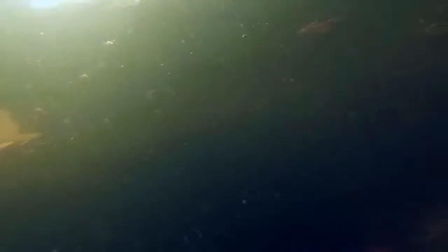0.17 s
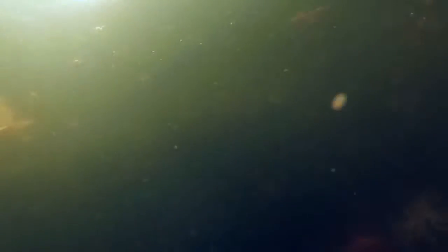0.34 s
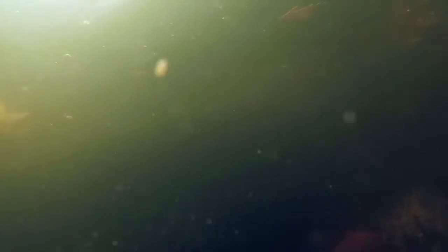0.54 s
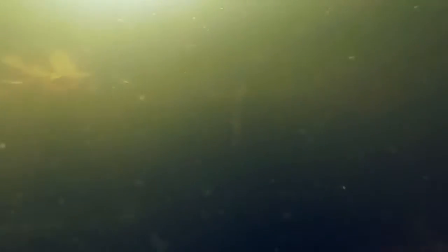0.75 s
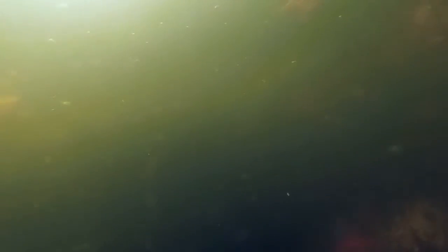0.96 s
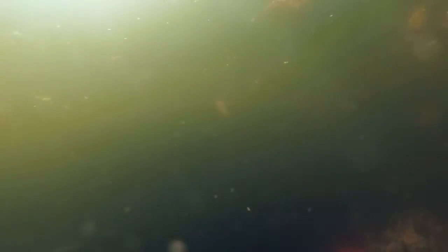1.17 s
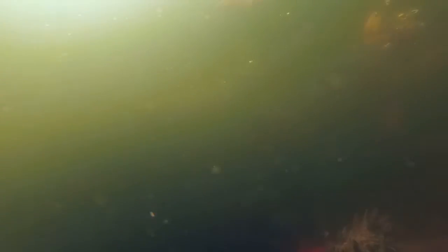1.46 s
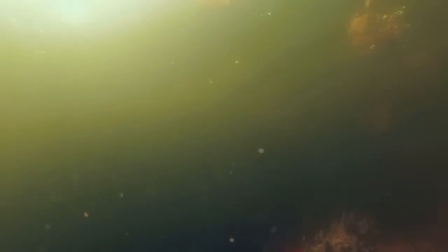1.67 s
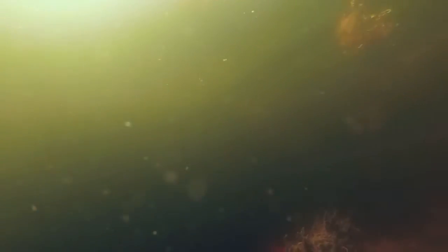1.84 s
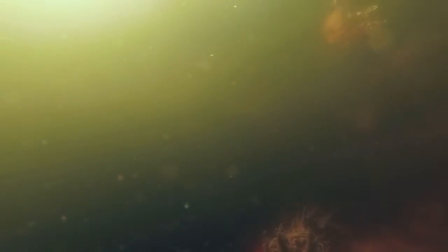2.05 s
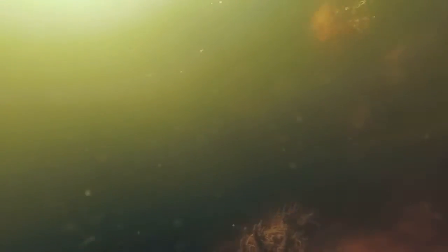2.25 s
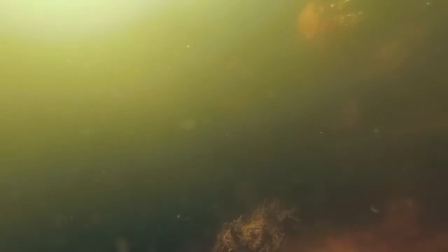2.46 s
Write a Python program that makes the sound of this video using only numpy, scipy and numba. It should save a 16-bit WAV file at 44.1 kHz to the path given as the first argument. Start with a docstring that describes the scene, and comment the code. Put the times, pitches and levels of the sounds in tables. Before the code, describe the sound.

Air gulps and bubbles burble under pond water, giving way to a steady muffled pump hum

```python
"""Pump hum under a garden pond

A small camera hangs in a sealed housing under the surface; its microphone sits inside, in the trapped air.
A mains pump, heard through the water, hums as sine tones and rattles as pulsed noise in resonant bands.
Flow rings the trapped air; bubbles and gulps escape as damped tones; the housing wobbles on its pole, knocks
and ticks. Filtered noise is the pond and the stirred water; the recorder's gain ducks when it gets loud."""
import sys
import numpy as np
from scipy import signal
from scipy.io import wavfile
from scipy.ndimage import uniform_filter1d
from numba import njit

SR = 44100
rng = np.random.default_rng(int(sys.argv[2]) if len(sys.argv) > 2 else 0)


def volts_from_decibels(level):
    """Turn decibel levels (scalar or array-like) into linear amplitude factors."""
    exponent = np.asarray(level, float) / 20
    return 10 ** exponent


def wav_out(sig):
    """Save sig, one row per channel (or a flat mono array), as 16-bit PCM at SR to the path in sys.argv[1]."""
    wavfile.write(sys.argv[1], SR, np.round(np.clip(np.atleast_2d(sig).T, -1, 1) * 32767).astype(np.int16))


N = 114660
T = np.arange(N) / SR
MAINS_HZ = 60.02


def level(x, db):
    """Set the rms level."""
    return x * volts_from_decibels(db) / np.sqrt(np.mean(x ** 2))


def curve(table, column):
    """One column of a table, interpolated over time to every sample."""
    return np.interp(T, [row[0] for row in table], [row[column] for row in table])


@njit
def svf(x, hz, width):
    """State-variable band-pass with a moving centre, gain 1 at the centre."""
    y, band_state, low_state = np.empty(len(x)), 0., 0.
    for i in range(len(x)):
        g = np.tan(np.pi * hz[i] / SR)
        damping = width / hz[i]
        v = (band_state + g * (x[i] - low_state)) / (1 + g * (g + damping))
        band_state = 2 * v - band_state
        low_state += 2 * g * v
        y[i] = damping * v
    return y


def band(x, hz, width, count=1):
    """Band-pass applied count times; width [Hz] is that of one pass."""
    for _ in range(count):
        x = svf(x, hz + np.zeros(len(x)), 1. * width)
    return x


@njit
def follow(x, up, down):
    """Envelope follower on the absolute value, with separate rise and fall speeds."""
    y, envelope = np.empty(len(x)), 0.
    for i in range(len(x)):
        size = abs(x[i])
        envelope += (size - envelope) * (up if size > envelope else down)
        y[i] = envelope
    return y


def walk(rate):
    """Random levels held 1 / rate s and smoothed twice over that time."""
    hold = int(SR / rate)
    steps = np.repeat(rng.standard_normal(N // hold + 1), hold)
    return 0.67 * uniform_filter1d(uniform_filter1d(steps, hold), hold)[:N]


def noise(hz, width, count=1):
    """Band noise of rms 1."""
    return level(band(rng.standard_normal(N), hz, width, count=count), 0)


def rings(rows, glide):
    """Damped sines that swell over the rise time; pitch climbs by the fraction glide per second."""
    out = np.zeros(N)
    for start, db, hz, rise, t60 in rows:
        t = np.maximum(T - start, 0)
        swell = np.sin(np.pi / 2 * np.minimum(t / rise, 1)) ** 2
        fade = volts_from_decibels(-60 * np.maximum(t - rise, 0) / t60)
        out += volts_from_decibels(db) * swell * fade * np.sin(2 * np.pi * hz * (t + glide * t ** 2 / 2))
    return out


# Pump tones through the water: (multiple of mains, level before the offsets below [dB])
PUMP_TONES = [(2, -24.5), (3, -38.5), (4, -32), (5, -46), (6, -37), (7, -50), (8, -35.5), (9, -40.5),
              (10, -33.5), (12, -49), (13, -50), (15, -52.5), (17, -58.5)]
# Pump level offsets: (time [s], multiples below 5 [dB], higher multiples [dB])
PUMP_OFFSETS = [(0, -9.5, 4.5), (.2, -4, 7.5), (.5, -6, 10.5), (.75, 0.5, 4), (1.05, 8, 7.5),
                (1.15, -4, 0.5), (1.3, -1.5, 0.5), (1.5, -1.5, 3), (2, -1.5, -3.5), (2.6, -2.5, -3)]


def pump():
    """The pump hums at multiples of the mains; each tone's level and phase waver alone."""
    waver_db, waver_per_s, drift_rad = 2, 14, 0.41
    low, upper = curve(PUMP_OFFSETS, 1), curve(PUMP_OFFSETS, 2)
    out = np.zeros(N)
    for k, db in PUMP_TONES:
        tone_db = db + (low if k < 5 else upper) + waver_db * walk(waver_per_s)
        drift = drift_rad * np.sqrt(k) * walk(waver_per_s)  # higher multiples drift further
        out += np.sqrt(2) * volts_from_decibels(tone_db) * np.sin(2 * np.pi * k * MAINS_HZ * T + drift)
    return out


def puffs():
    """A puff of noise each half mains cycle, each of its own size; more even once the housing hangs still."""
    scatter_db, decay_half_cycles = 3.5, .14
    steady = np.where(T < 1.1, .18, .45)  # constant noise under the puffs
    half_cycles = 2 * MAINS_HZ * T + .5
    sizes = volts_from_decibels(scatter_db * rng.standard_normal(int(half_cycles[-1]) + 1))
    puff = sizes[half_cycles.astype(int)] * np.exp(-(half_cycles % 1) / decay_half_cycles)
    return rng.standard_normal(N) * (steady + puff)


# Housing resonances around the microphone: (centre [Hz], width of one pass [Hz], relative level [dB])
HOUSING_MODES = [(970, 260, -9), (1650, 540, 0.5), (2272, 283, 3), (2756, 390, -7.5), (3128, 410, -5.5),
                 (3643, 290, -12.5), (5260, 2100, -17.5), (6660, 1000, -20), (9770, 900, -27.5),
                 (12000, 7400, -25.5)]
# Rattle of the housing: (time [s], level [dB])
RATTLE_LEVEL = [(0, -37), (.3, -37.5), (.36, -29), (.43, -33.5), (.5, -39), (.8, -37), (.99, -36),
                (1.03, -45.5), (1.2, -44.5), (1.4, -43.5), (2.6, -44)]
TICK_S = .0018  # decay time of a tick, also of each crackle


def rattle():
    """The pump's puffs ring the low housing modes; clusters of tiny ticks ring the high ones."""
    crackle_per_s, cluster_db = 45, 14  # middle rate, and how far it swings
    crackle_db, spread_db = 6, 4  # smallest crackle, and mean excess over it
    crackle_above_hz = 4400
    draw = rng.random((N, 2))
    happens = draw[:, 0] < crackle_per_s * volts_from_decibels(cluster_db * walk(9)) / SR
    hits = happens * volts_from_decibels(crackle_db - spread_db * np.log(draw[:, 1] + 1e-9))
    gate = signal.lfilter([1], [1, -np.exp(-1 / (TICK_S * SR))], hits)
    low, high = puffs(), rng.standard_normal(N) * (1 + gate)
    body = np.zeros(N)
    for hz, width, db in HOUSING_MODES:
        source = low if hz < crackle_above_hz else high
        body += level(band(source, hz, width, count=3), db)
    return level(body, 0) * volts_from_decibels(curve(RATTLE_LEVEL, 1))


# Trapped air around the microphone, rung by the flow: (time [s], level [dB])
AIR_LEVEL = [(0, -24), (.128, -21.5), (.14, -22.5), (.17, -19), (.208, -27.5), (.26, -16), (.302, -29),
             (.32, -18), (.345, -21), (.385, -9), (.42, -18), (.476, -44), (.496, -13.5), (.525, -25),
             (.55, -15.5), (.598, -30.5), (.612, -26), (.648, -13), (.68, -23), (.734, -42), (.76, -20.5),
             (.95, -14), (1.03, -28.5), (1.3, -32), (1.55, -35), (1.8, -47.5), (2.6, -47)]


def air():
    """Pulsing flow rings the air pocket in bursts; its pitch wanders as the pocket changes shape."""
    centre_hz, width_hz, wander = 575, 161, 0.038  # wander is a fraction of the pitch
    pitch = centre_hz * (1 + wander * walk(11.72))
    ring = level(band(puffs(), pitch, width_hz, count=2), 0)
    return ring * volts_from_decibels(curve(AIR_LEVEL, 1))


# Gulps of air leaving the housing:
# (time [s], tone level before roughening [dB], pitch [Hz], swell [s], spray level before filtering [dB])
GULP_EVENTS = [(.812, -0.5, 703, 0.026, -31), (.917, -5, 716, 0.018, -28.5), (.97, 3, 693, 0.022, -30)]


def gulps():
    """Big bubbles: a rough tone that swells and dies, with noisy spray that fades along with it."""
    t60_s, rough_db = 0.065, 4
    tone, gate = np.zeros(N), np.zeros(N)
    rough = volts_from_decibels(rough_db * walk(150))
    for start, db, hz, swell, spray_db in GULP_EVENTS:
        t = np.maximum(T - start, 0)
        rise = np.minimum(t / swell, 1) ** 0.59
        fade = volts_from_decibels(-60 * np.maximum(t - swell, 0) / t60_s)
        tone += volts_from_decibels(db) * rise * fade * rough * np.sin(2 * np.pi * hz * t)
        gate += volts_from_decibels(spray_db) * (t > 0) * fade
    spray = gate * rng.standard_normal(N) * volts_from_decibels(6 * walk(300))
    # spray bands: (centre [Hz], width of one pass [Hz], gain [dB])
    for hz, width, db in [(1150, 1100, 17), (2330, 1100, 11.8), (3460, 520, 5.9)]:
        tone += volts_from_decibels(db) * band(spray, hz, width, count=3)
    return tone


# Bubbles close to the housing: (time [s], peak level [dB], starting pitch [Hz], rise [s], 60 dB decay [s])
BUBBLE_EVENTS = [(.026, -17.5, 1360, 0.0022, 0.02), (.08, -22, 1650, 0.0023, 0.027),
                 (.135, -20.5, 1754, 0.0018, 0.011), (.164, -23, 1430, 0.0022, .04),
                 (.207, -20, 1270, 0.0036, 0.014), (.268, -5.5, 612, 0.0026, .09),
                 (.356, -18, 1450, 0.002, 0.0096), (.645, -23.5, 2340, .002, 0.022),
                 (.705, -5.5, 1650, 0.0022, 0.023), (.706, -13.5, 1100, 0.0019, 0.014),
                 (.772, -25.5, 2030, 0.0017, 0.02), (.815, -24.5, 1390, 0.0066, 0.06),
                 (.842, -23, 1690, .003, 0.022), (.918, -18, 1028, 0.008, 0.12),
                 (.953, -46, 2220, .002, 0.017), (1.001, -14.5, 1110, 0.0029, 0.067),
                 (1.016, -10, 1337, 0.0034, 0.043), (1.014, -4.5, 630, 0.0052, .06)]


def bubbles():
    """Each bubble is a damped sine whose pitch climbs by 0.4 of its start per second."""
    return rings(BUBBLE_EVENTS, 0.4)


# Housing wobbling on its pole: (time [s], peak level [dB], pitch [Hz], rise [s], 60 dB decay [s])
WOBBLE_EVENTS = [(.778, -11, 27, .005, .25), (.8402, -2, 32, .01, .3), (.8375, 4.5, 25.6, .08, .65)]
# Higher modes of the pole: (time [s], peak level [dB], pitch [Hz], rise [s], 60 dB decay [s])
POLE_MODES = [(0.815, -11.5, 63.7, 0.053, 0.68), (0.789, -12.5, 145.2, 0.023, 0.93),
              (0.799, -13, 297, 0.018, 0.61), (0.98, -11, 309, 0.016, 0.2)]


def wobble():
    """The housing sways on its pole as deep damped sines; the pole's higher modes ring along."""
    return rings(WOBBLE_EVENTS + POLE_MODES, 0)


# Dull knocks at the housing: (time [s], peak level [dB], pitch [Hz], 60 dB decay [s])
KNOCK_EVENTS = [(.757, -26, 239, 0.031), (.773, -18, 193, 0.03), (.808, -17, 320, 0.092),
                (.848, -7, 309, 0.11), (1.8605, -7.5, 353, 0.022), (1.884, -6.5, 390, 0.021),
                (1.884, -14, 679, 0.071), (1.885, -34, 1065, 0.038), (1.894, -12.5, 472, 0.06)]


def knocks():
    """Knocks are damped sines of steady pitch that rise within 2 ms."""
    return rings([(start, db, hz, .002, t60) for start, db, hz, t60 in KNOCK_EVENTS], 0)


# Sharp ticks at the housing: (time [s], peak level [dB], centre [Hz], width of one pass [Hz])
TICK_EVENTS = [(0.01, -20.5, 3170, 2190), (0.027, -16, 2600, 3500), (0.136, -22.5, 1440, 2000),
               (.14, -45.5, 12000, 4000), (.209, -45.5, 10500, 3980), (0.2188, -34, 5030, 4000),
               (.283, -50, 12700, 2000), (.292, -48, 12000, 3000), (.3551, -46, 5500, 4000),
               (.3716, -40, 5000, 5000), (0.4603, -41, 7800, 3000), (.4783, -38.5, 6500, 4000),
               (0.537, -23.5, 1280, 1500), (.6454, -36, 3680, 4000), (0.7358, -25.5, 4650, 2500),
               (0.846, -36, 3950, 3000), (0.958, -28.5, 8100, 10200), (1.0542, -10, 2050, 1530),
               (1.057, -27, 3980, 5560), (1.078, -17, 1610, 1500), (1.287, -32, 2480, 3500),
               (1.516, -41.5, 6030, 5000), (1.5554, -45, 6800, 6000), (1.646, -25, 1860, 2200),
               (1.655, -30, 3180, 5030), (1.885, -25.5, 1880, 2530), (1.897, -28.5, 2430, 2000),
               (2.2386, -40.5, 6950, 5000), (2.013, -40, 6800, 4000)]


def ticks():
    """Short decaying noise bursts, each in its band."""
    n = 1024
    out = np.zeros(N + n)
    for start, db, hz, width in TICK_EVENTS:
        first = int(start * SR)
        burst = rng.standard_normal(n) * np.exp(-np.arange(n) / SR / TICK_S)
        burst = band(burst, hz, width, count=4)
        out[first:first + n] += volts_from_decibels(db) * burst / np.abs(burst).max()
    return out[:N]


# Water stirred by the moving housing: (time [s], low level [dB], middle level [dB])
STIR_LEVEL = [(0, -49, -32.5), (.22, -61.5, -28), (.45, -39.5, -25), (.6, -23, -29), (.74, -23, -27),
              (.78, -23, -26.5), (.86, -21, -17.5), (.9, -21.5, -26.5), (1.0, -17.5, -24.5),
              (1.1, -38.5, -32), (1.4, -33, -37), (1.86, -36, -33), (1.9, -42, -28.5), (2.0, -37.5, -40.5),
              (2.6, -51, -38.5)]
# Deepest rumble: (time [s], level [dB])
DEEP_LEVEL = [(0, -36), (.22, -29), (.65, -38), (1.0, -36), (2.6, -39)]


def stirred_water():
    """The moving housing stirs the water: rumble in three noise bands that swell and fade."""
    deep = noise(17.0, 22, count=2) * volts_from_decibels(curve(DEEP_LEVEL, 1))
    low = noise(139, 130, count=2) * volts_from_decibels(curve(STIR_LEVEL, 1) + 3.7 * walk(30))
    middle = noise(351, 330, count=2) * volts_from_decibels(curve(STIR_LEVEL, 2) + 1.3 * walk(40))
    return deep + low + middle


# Pond background, all around: (frequency [Hz], relative density [dB per Hz])
WATER_SPECTRUM = [(20, 3.5), (65, -12.5), (150, -11), (550, -16.5), (750, -36.5), (1100, -49),
                  (2200, -47.5), (4500, -49.5), (8000, -54.5), (13000, -72), (15500, -80)]


def water():
    """Pond background: noise in half-octave steps, each band wavering alone."""
    out = np.zeros(N)
    spectrum_hz, density_db = np.array(WATER_SPECTRUM).T
    for hz in 25 * 2 ** np.arange(0, 9.3, .5):
        density = np.interp(np.log(hz), np.log(spectrum_hz), density_db)
        band_db = density + 10 * np.log10(hz) + 1.7 * walk(11)  # wider bands hold more power
        out += volts_from_decibels(band_db) * noise(hz, hz / 1.84, count=2)
    return level(out, -31)


def scene():
    """All sources as they reach the microphone inside the housing, on one channel."""
    machine = pump() + rattle()
    escaping_air = air() + gulps() + bubbles()
    housing = wobble() + knocks() + ticks()
    return (machine + escaping_air + housing + stirred_water() + water())[None]


def low_pass(x):
    """Removes everything above the highest recorded frequency."""
    return signal.sosfilt(signal.butter(12, 15300, fs=SR, output="sos"), x)


def record(dry):
    """Gain control turns loud passages down and recovers slowly; peaks are rounded."""
    top_db, ratio, attack_s, release_s = -16, 2, .03, .14
    envelope = follow(dry[0], 1 / (attack_s * SR), 1 / (release_s * SR))
    gain = np.minimum(1, volts_from_decibels(top_db) / (envelope + 1e-9)) ** (1 - 1 / ratio)
    mix = np.tanh(0.55 * dry * gain) / 0.64
    return low_pass(mix)


dry = scene()
out = record(dry)
wav_out(out)
```